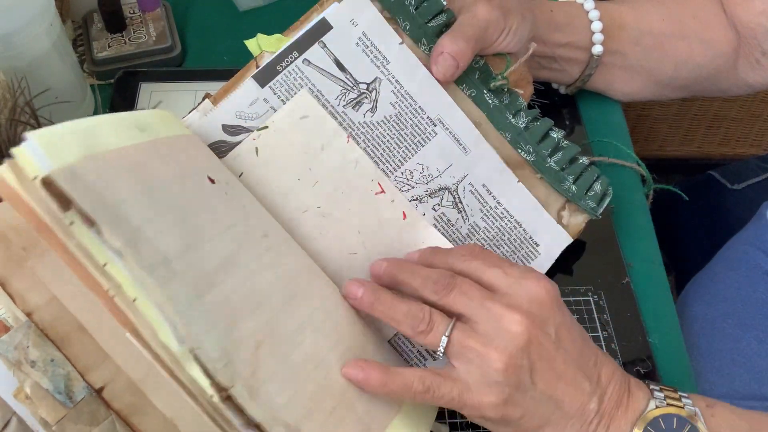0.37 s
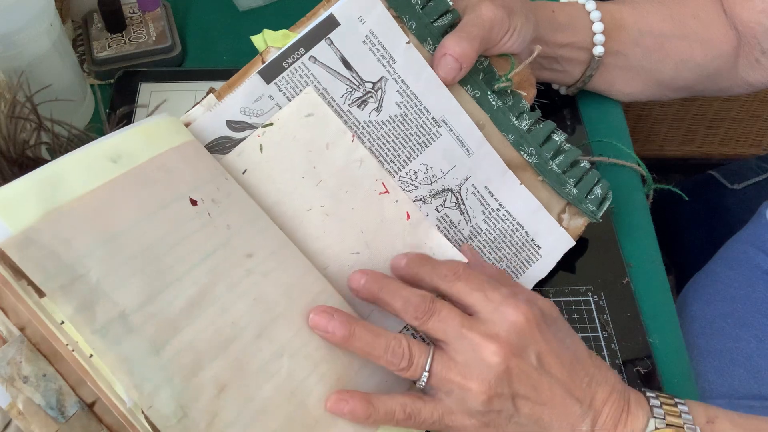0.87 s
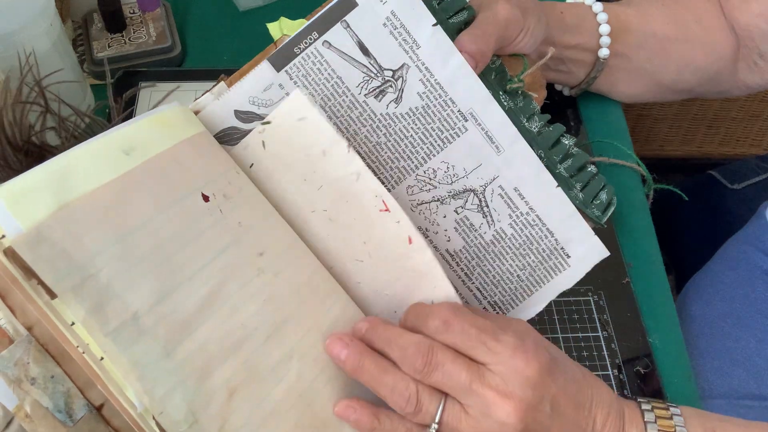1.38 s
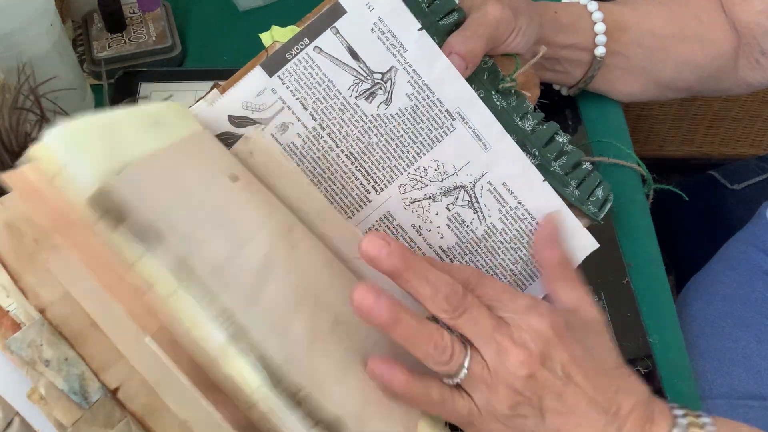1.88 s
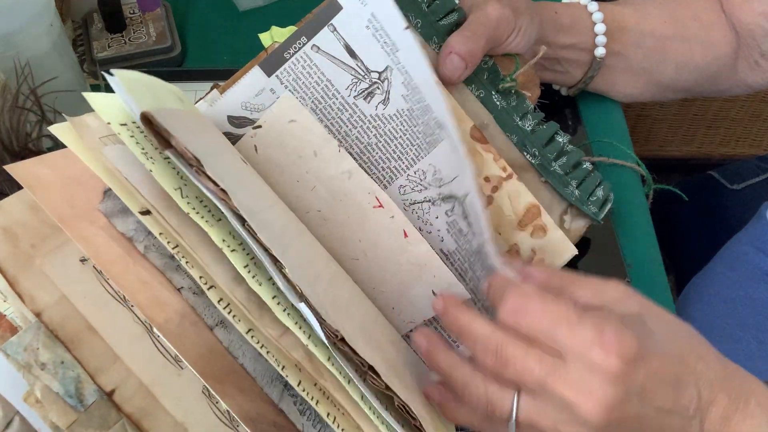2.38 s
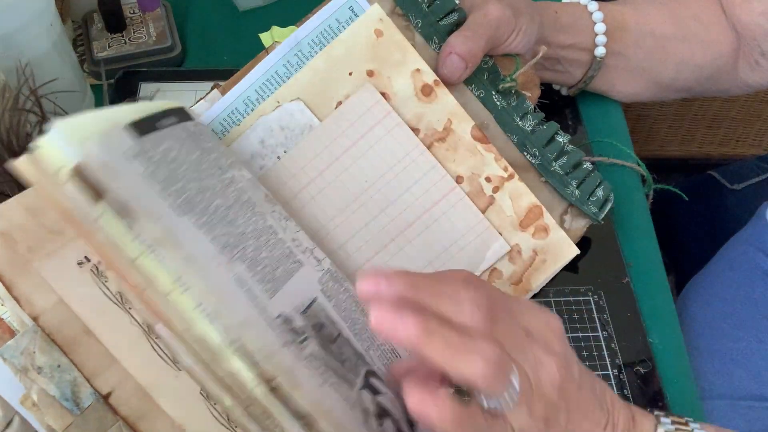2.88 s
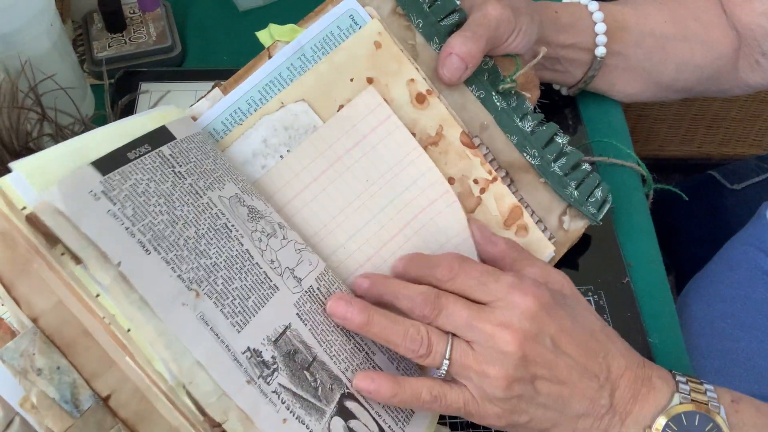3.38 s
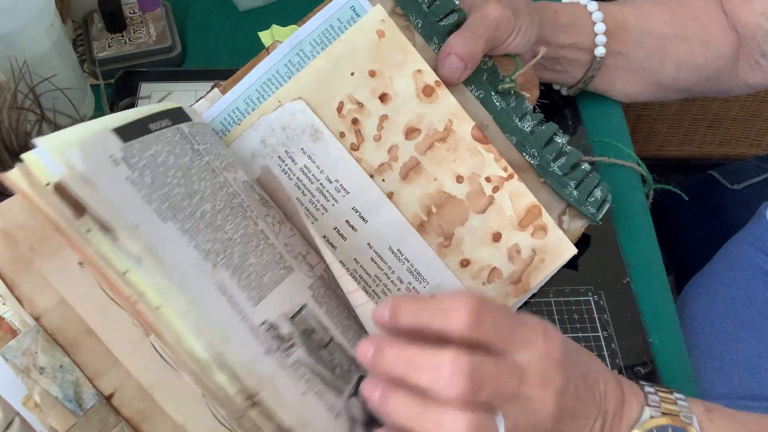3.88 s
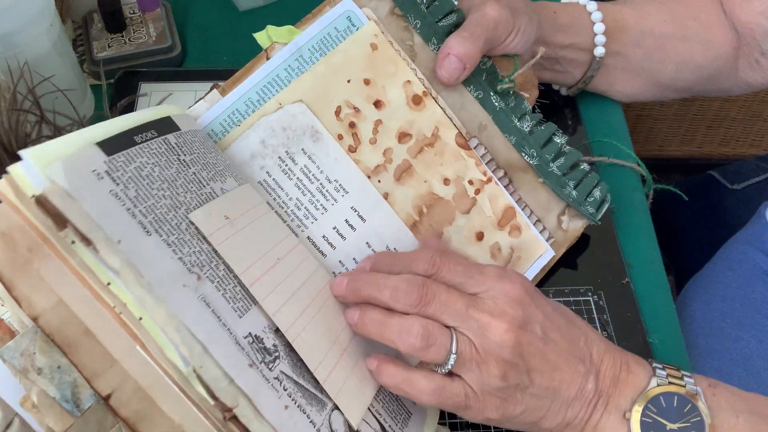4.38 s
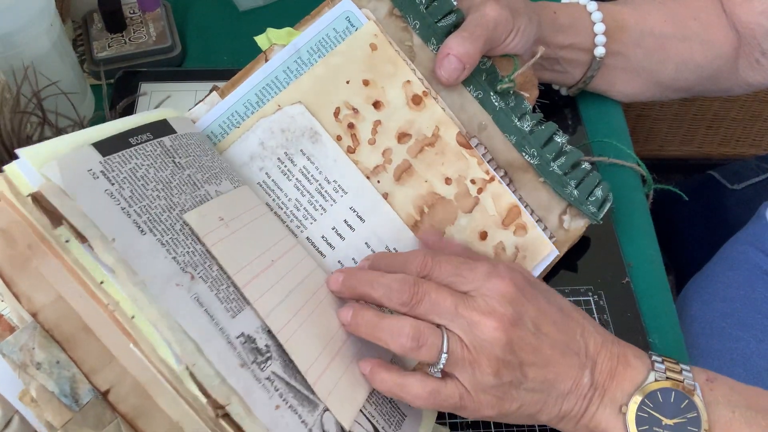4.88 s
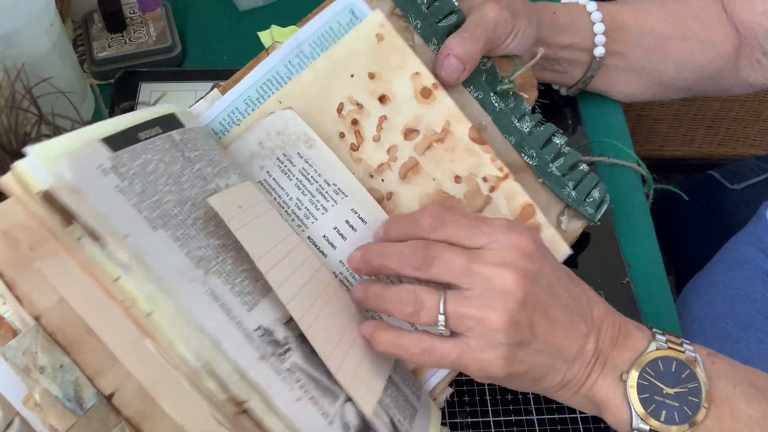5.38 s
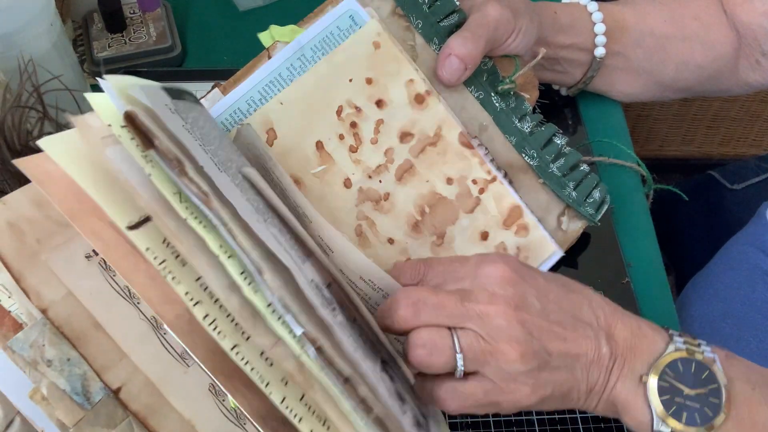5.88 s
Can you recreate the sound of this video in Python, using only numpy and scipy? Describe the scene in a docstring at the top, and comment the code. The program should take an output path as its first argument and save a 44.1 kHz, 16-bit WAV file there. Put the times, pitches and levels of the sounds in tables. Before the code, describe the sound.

Hands handle a thick paper journal at close range in a still, furnished room. Faint skin-on-paper rubs and light brushes come first, then a bright sharp snap with a flick just after two seconds. Softer rustles, small ticks and low bumps follow, a quieter stretch of rubbing, then a dense cluster of crackling page flips near the end.

```python
"""A faint rub of skin on thick paper comes first; hands then slide over, lift and flick the pages of a journal.
Strokes are friction noise tinted by the bent sheet, snaps are bursts of crackle with a ringing tail,
and thuds are sagging low tones with a flap of pages, all over the still air of a quiet furnished room.
A small recorder close by has two ports and takes most of its treble from the left one."""
import sys
import numpy as np
from scipy import signal
from scipy.fft import rfft, irfft, next_fast_len
from scipy.io import wavfile
from scipy.ndimage import uniform_filter1d, map_coordinates

SR = 44100
rng = np.random.default_rng(int(sys.argv[2]) if len(sys.argv) > 2 else 0)


def bounce(signal):
    """Save signal as a 16-bit WAV file at the path given by the first command-line argument."""
    frames = np.transpose(np.atleast_2d(signal))
    limited = np.clip(frames, -1, 1)
    pcm = np.round(limited * 32767).astype(np.int16)
    wavfile.write(sys.argv[1], SR, pcm)


def decibels_to_gain(level_db):
    """Convert a level in decibels to a linear amplitude gain (20 dB per decade)."""
    exponent = np.asarray(level_db, float) / 20
    return 10 ** exponent


N = 264159  # samples

# spectral shape of the hiss as heard, with a steep band limit at the top: f/Hz, density level/dB (relative)
HISS_SPECTRUM = [(4500, -27.5), (7000, 5), (10000, 1), (11500, -3.5), (15750, -3), (16000, -60)]


def unit(x):
    """Normalisation: the signal is scaled to rms 1."""
    return x / np.sqrt(np.mean(x ** 2) + 1e-20)


def along(points, hz):
    """Interpolation of (f/Hz, value) points on a logarithmic frequency axis."""
    f, v = np.transpose(points)
    return np.interp(np.log(hz + 1), np.log(f + 1), v)


def filtered(x, response):
    """Linear filtering: the spectrum is multiplied by a complex response of frequency."""
    m = next_fast_len(x.shape[-1] + 8192)
    hz = np.fft.rfftfreq(m, 1 / SR)
    return irfft(rfft(x, m) * response(hz), m)[..., :x.shape[-1]]


def coloured(x, spectrum):
    """Spectral shaping at constant power: white noise keeps its mean square."""
    power = np.mean(decibels_to_gain(2 * along(spectrum, np.linspace(0, SR / 2, 999))))
    return filtered(x, lambda hz: decibels_to_gain(along(spectrum, hz)) / np.sqrt(power))


def wobble(rate):
    """Slow random modulation: a smooth curve through rate random knots a second."""
    knots = rng.standard_normal(int(N * rate / SR) + 4)
    return map_coordinates(knots, [np.arange(N) * rate / SR])


def gritty(slow_db, fast_db, crinkle_db):
    """Stick-slip friction: two unrelated noises share one uneven grip, as fibres catch in clumps and crinkles pop."""
    pops = (rng.random(N) < 70 / SR) * decibels_to_gain(crinkle_db + 3.4 * rng.standard_normal(N))  # about 70 a second
    crinkles = signal.fftconvolve(pops, np.exp(-np.arange(300) / 45))[:N]  # each decays with a 1 ms time constant
    grip = decibels_to_gain(slow_db * wobble(35) + fast_db * wobble(600)) + crinkles
    return unit(grip * rng.standard_normal((2, N)))


def page_flap():
    """Flexural motion of loose sheets: gritty noise confined to low frequencies."""
    # spectral shape of flapping pages: f/Hz, density level/dB (relative)
    flap_spectrum = [(60, -27), (180, -9.5), (500, -4.5), (900, -19), (1500, -27.5)]
    return coloured(gritty(slow_db=2.5, fast_db=1.7, crinkle_db=3), flap_spectrum)


def room_air():
    """Stationary background noise: the still air of the room is white noise shaped towards the bass."""
    # spectral shape of the room air: f/Hz, density level/dB (relative)
    air_spectrum = [(15, -71), (25, -9), (68, -1.5), (117, -2), (175, -10.5), (206, -11.5), (438, -24.5),
                    (589, -38), (1130, -27), (15900, -40)]
    return decibels_to_gain(-73.5) * coloured(rng.standard_normal((2, N)), air_spectrum)


def thuds():
    """Damped oscillation: the book pushes softly into the table, its pitch wavers and sags, and the pages flap."""
    # the book rocking on the table: t/s, tone level/dB, nominal f/Hz, page flap level/dB (before rise and decay)
    thud_table = [(1.8, -62, 86, -60), (1.938, -54, 126, -48), (2.261, -50.5, 84, -48),
                  (2.455, -71, 113, -53), (3.007, -42, 113, -44.5), (3.599, -62, 85.5, -62),
                  (3.81, -61, 85, -59), (3.911, -59, 102, -57), (4.21, -44, 76, -45.5),
                  (4.639, -55, 75.4, -56), (4.967, -56, 96, -55), (5.402, -51, 81, -67),
                  (5.671, -47.5, 107, -41.5), (5.753, -48, 69.6, -48), (5.915, -54, 138, -44)]
    tone_t60, flap_t60 = 0.23, 0.24  # s
    pivot_hz = 145  # the pitch starts above this and sags to slightly below its nominal value
    tone, puff = np.zeros(N + SR), np.zeros(N + SR)
    t = np.arange(SR // 3) / SR
    for s, tone_db, hz, flap_db in thud_table:
        start = round(s * SR)
        waver = 0.1 * map_coordinates(rng.standard_normal(20), [t * 45])
        sag = (pivot_hz / hz) ** (1.8 * np.exp(-t / 0.011) - 0.15)
        phase = 2 * np.pi * np.cumsum(hz * (1 + waver) * sag) / SR
        lumps_db = 4 * map_coordinates(rng.standard_normal(20), [t * 30])  # the book settles unevenly
        rise = 1 - np.exp(-t / 0.0055)
        tone[start:][:len(t)] += decibels_to_gain(tone_db + lumps_db - 60 * t / tone_t60) * rise * np.sin(phase)
        puff[start:][:len(t)] += decibels_to_gain(flap_db - 60 * t / flap_t60) * rise
    return (tone[:N] + puff[:N] * page_flap()) * [[1], [0.4]]  # weights of the common and the opposed part


def snaps():
    """Sudden release of elastic energy: a crease gives way in brief crackle, then sheet and room ring on."""
    # creases and edges snapping, and one short hissing stroke at 1.974 s:
    # t/s, crack level/dB, body level/dB, edge level/dB, crackle T60/ms
    snap_table = [(0.914, -61, -65, -62, 11.6), (1.117, -58.5, -72, -56, 24), (1.59, -53, -60.5, -66, 23),
                  (1.687, -46.5, -64, -68, 23), (1.974, -55, -66, -43, 48), (2.103, -59, -47, -57, 18),
                  (2.19, -76, -54.5, -64, 11.3), (2.234, -43, -69, -51, 16), (2.25, -34, -46, -31, 24),
                  (2.2555, -18, -50, -25.5, 21.3), (2.268, -33.5, -40.5, -52, 14.7),
                  (2.389, -73, -49, -56, 5.6), (2.463, -55, -48.5, -70, 35), (2.572, -46, -55, -56, 18),
                  (2.68, -54.5, -53.5, -60, 10), (2.734, -43.5, -85, -38.5, 8.5),
                  (2.752, -40, -73, -59, 7.3), (2.771, -46, -49.5, -57, 14.5), (2.953, -55, -52, -51, 57),
                  (3.004, -41, -43.5, -31, 32), (3.119, -53, -56, -50, 12),
                  (3.2075, -38.5, -46.5, -47.5, 7.9), (3.312, -48.5, -51, -65, 12),
                  (3.343, -60, -69, -52, 22), (3.369, -54.5, -70, -47, 9), (3.378, -70, -56.5, -63, 11),
                  (3.592, -51.5, -46.5, -40.5, 23.5), (3.817, -38, -75, -59, 10),
                  (3.906, -34, -39.5, -39.5, 14), (3.915, -26.5, -38, -55, 14.7),
                  (4.147, -57, -71, -54.5, 11), (4.158, -66, -56, -57, 17), (4.208, -56, -45.5, -53, 34),
                  (4.219, -66, -52, -59, 21), (4.253, -44, -52, -34.5, 21), (4.282, -54, -64, -51, 12),
                  (4.309, -52, -53.5, -49, 16), (4.638, -56.5, -51, -49.5, 36),
                  (4.967, -53.5, -48.5, -47.5, 11.2), (5.119, -63, -50.5, -71, 11.3),
                  (5.341, -72, -58, -72, 8.7), (5.357, -51, -44, -77, 35), (5.405, -31, -35.5, -27.5, 12),
                  (5.415, -33, -40, -35, 24), (5.671, -22.5, -25, -42, 8.8), (5.674, -30.5, -34, -25.5, 17),
                  (5.701, -29, -40, -32, 11), (5.7084, -25, -37.5, -26, 11.6), (5.746, -30, -33, -22, 19.2),
                  (5.765, -32, -35, -47, 17), (5.911, -25.5, -33.5, -16.5, 13),
                  (5.916, -24, -37.5, -49, 21.3)]
    # spectral shape of the crack: f/Hz, level/dB (relative)
    crack_spectrum = [(300, -95), (1200, -12.5), (2200, -2), (4000, 6), (6500, -7.5), (8500, -42)]
    # spectral shape of the body knock: f/Hz, level/dB (relative)
    body_spectrum = [(60, -63), (250, 0), (500, -5), (1100, 6.5), (2000, 4.5), (3000, -23)]
    edge_spectrum = HISS_SPECTRUM[:-1] + [(16800, -33)]
    ring_t60 = 0.27  # s
    attack_share = 0.078  # of the crackle T60: slow creases also start softly
    crackle_db, tick_db = 6.5, 15  # the tick is also scaled inversely with T60

    out = np.zeros((2, N + SR))
    t = np.arange(-256, 12032) / SR  # the lead leaves room for the zero-phase colouring
    hz = np.fft.rfftfreq(len(t), 1 / SR)
    crack, body, edge = (unit(decibels_to_gain(along(c, hz))) for c in (crack_spectrum, body_spectrum, edge_spectrum))

    def bumps(size):
        return unit(uniform_filter1d(rng.standard_normal(len(hz)), size))

    for s, crack_db, body_db, edge_db, t60_ms in snap_table:
        t60 = t60_ms / 1000
        attack = attack_share * t60
        # relative to its snap, the ring is weaker the louder the snap
        ring_db = -9.5 - 0.31 * (max(crack_db, body_db, edge_db) + 45)
        settle_db = 2.17 * map_coordinates(rng.standard_normal(40), [np.abs(t) * 90])  # the sheet settles
        crackle = decibels_to_gain(crackle_db - 60 * t / t60)
        ring = decibels_to_gain(ring_db + settle_db - 60 * t / ring_t60)
        burst = (crackle + ring) * np.clip(t / attack, 0, 1) * rng.standard_normal((2, len(t)))
        # the first fibre breaks as one sharp tick
        burst[0, np.searchsorted(t, attack)] += decibels_to_gain(tick_db) * 0.014 / t60
        tint_db = 1.5 * bumps(200) + bumps(40)  # each snap has its own
        colour = decibels_to_gain(tint_db) * (decibels_to_gain(crack_db) * crack + decibels_to_gain(body_db) * body + decibels_to_gain(edge_db) * edge)
        out[:, round((s + t[0]) * SR):][:, :len(t)] += irfft(rfft(burst) * colour, len(t))
    return out[:, :N]


def strokes():
    """Friction exciting a resonator: each stroke swells and fades, singing in the moving resonance of the sheet."""
    # strokes of skin and paper: peak t/s, half length/ms (limited to 150), rub level/dB, hiss level/dB
    stroke_table = [(0.005, 95, -58.5, -62), (0.203, 31.6, -48, -66), (0.294, 60, -46, -53.5),
                    (0.376, 19, -70, -52.5), (0.546, 8, -63.5, -58.5), (0.62, 45, -59.5, -57),
                    (0.703, 48, -57.5, -59.5), (0.835, 24.4, -56, -54.5), (0.936, 44, -63, -66),
                    (1.011, 33, -60.5, -68), (1.175, 35, -50.5, -51), (1.274, 29.5, -60.5, -54),
                    (1.515, 68, -51, -55), (1.633, 18.6, -48, -47), (1.705, 20.3, -46.5, -51.5),
                    (1.833, 30, -46, -44.5), (1.925, 80, -50, -50.5), (2.115, 9.3, -49.5, -75),
                    (2.217, 60, -57, -56), (2.267, 13.5, -33, -58), (2.335, 62, -48.5, -56),
                    (2.56, 72, -57, -57.5), (2.7, 81, -53, -51.5), (2.761, 15, -58, -45),
                    (3.015, 57.6, -50.5, -51), (3.158, 34, -55, -51), (3.346, 52, -58, -57.5),
                    (3.484, 33, -62, -61.5), (3.65, 145, -55.5, -60.5), (3.825, 48, -50.5, -49),
                    (3.91, 7.7, -38.5, -43), (4.12, 72, -60.5, -69.5), (4.257, 44, -49, -48.5),
                    (4.379, 28, -44.5, -51.5), (4.505, 110, -64, -78), (4.568, 30.7, -53.5, -52),
                    (4.758, 27.6, -47.5, -53.5), (4.851, 140, -64.5, -89), (4.915, 24.5, -56.5, -53.5),
                    (5.105, 20, -49, -53), (5.157, 97, -58, -88), (5.442, 52.5, -45, -52.5),
                    (5.6, 180, -53.5, -58.5), (5.695, 21, -38.5, -63), (5.739, 75, -40.5, -44.5),
                    (5.937, 21.2, -37, -49), (5.99, 22, -45, -56)]
    # resonance of the bent sheet: t/s, f/Hz
    sheet = [(0.0, 1470), (0.1, 2370), (0.65, 5100), (0.9, 3300), (1.15, 5100), (1.35, 3100), (2.02, 2600),
             (2.1, 3800), (2.42, 4070), (2.48, 2130), (3.28, 2450), (3.62, 2200), (3.74, 3570),
             (4.24, 2260), (4.65, 2030), (5.81, 2740), (5.87, 4040)]
    # how loosely the handled pages hang: t/s, low flap level relative to the rub/dB
    loose = [(0.1, -21), (0.6, -29.5), (1.4, -21.5), (1.9, -19), (2.6, -25.5), (3.2, -14.5), (3.9, -25),
             (4.3, -14.5), (5.1, -9), (5.5, -23.5), (5.9, -18)]
    # spectral shape of the rub: f/Hz, density level/dB (relative)
    rub_spectrum = [(300, -23), (800, -5.5), (1500, -1.5), (3000, -3.5), (6000, -5), (8500, -28.5)]
    fall_over_rise = 1.1  # a stroke fades a little slower than it swells

    power, now = np.zeros((3, N)), np.arange(N) / SR
    for s, half_ms, rub_db, hiss_db in stroke_table:
        width = min(half_ms, 150) / 1000 * np.where(now < s, 1, fall_over_rise)
        flap_db = rub_db + np.interp(s, *np.transpose(loose))
        peak_power = decibels_to_gain(2 * np.array([rub_db, hiss_db, flap_db]))
        power += peak_power[:, None] * np.exp(-((now - s) / width) ** 2)
    rub_gain, hiss_gain, flap_gain = np.sqrt(power)

    grit = gritty(slow_db=2.5, fast_db=1.0, crinkle_db=-3.5)
    hz, t, z = signal.stft(grit, SR, nperseg=512, noverlap=384)

    def patch(tall, long):
        """Random spectral tint: noise smoothed over tall frequency bins and long frames."""
        field = uniform_filter1d(rng.standard_normal(z.shape[1:]), tall, axis=0)
        return unit(uniform_filter1d(field, long, axis=1))

    def resynthesised(gain):
        """Time-varying filtering: the weighted short-time spectra are overlapped and added."""
        return signal.istft(z * gain, SR, nperseg=512, noverlap=384)[1][:, :N]

    octaves = np.log2((hz[:, None] + 1) / np.interp(t, *np.transpose(sheet)))
    resonance_db = 6.7 * np.exp(-(octaves / 0.72) ** 2)
    tint_db = 1.8 * patch(8, 14) + 4.5 * patch(1, 40)  # broad patches and narrow bands, as from reflections
    gain = decibels_to_gain(along(rub_spectrum, hz)[:, None] + resonance_db + tint_db)
    gain /= np.sqrt(np.mean(gain ** 2, axis=0))
    rub = resynthesised(gain)
    # the hiss gets a random tint in broad patches and in narrow, slowly changing bands
    hiss_tint = decibels_to_gain(1.5 * patch(12, 20) + 2.5 * patch(1, 30))
    hiss = unit(coloured(resynthesised(hiss_tint), HISS_SPECTRUM))
    return rub_gain * rub + hiss_gain * hiss + flap_gain * page_flap()


def ports(pair):
    """Partial coherence: a common and an opposed part make left and right; the left is earlier and mostly louder."""
    # likeness of left and right: f/Hz, coherence (0-1)
    alike = [(100, 0.57), (400, 0), (1200, 0.54), (2500, 0.74), (5000, 0)]
    # left louder than right: f/Hz, level difference/dB
    left_excess = [(100, 0.5), (1000, 4), (2500, 1.5), (5000, -0.5)]
    left_leads = 0.00013  # s, the pages lie nearer the left port
    side = np.array([[1], [-1]])

    def share(hz):
        angle = np.arccos(np.clip(along(alike, hz), 0, 1)) / 2
        return np.array([np.cos(angle), np.sin(angle)])

    def reach(hz):
        return decibels_to_gain(side * along(left_excess, hz) / 2) * np.exp(1j * side * np.pi * hz * left_leads)

    common, opposed = filtered(pair, share)
    return filtered(common + side * opposed, reach)


def scene():
    """Superposition: air, thuds, snaps and strokes add before they reach the ports."""
    return ports(room_air() + thuds() + snaps() + strokes())


def band_limit(x):
    """A steep low-pass at the top of the band."""
    return signal.sosfilt(signal.butter(12, 16780, fs=SR, output="sos"), x)


def record(dry):
    """Crossover and phase difference: left-port treble feeds both sides, late on the left, in and out of step."""
    crossover_hz, in_step_hz = 6990, 12250
    treble_lag = 1.265e-4  # s, left behind right
    side = np.array([[-1], [1]])

    def high(hz):
        return 0.97 / (1 + (crossover_hz / (hz + 1)) ** 24)

    def treble_path(hz):
        shift = np.exp(1j * np.pi * side * (hz - in_step_hz) * treble_lag)
        return np.sqrt(high(hz)) * shift

    def own_path(hz):
        return (1 - high(hz)) / (1 + (32 / (hz + 1)) ** 4)  # no deep bass

    treble = filtered(dry[[0, 0]], treble_path)
    own = filtered(dry, own_path)
    return band_limit(own + treble)


dry = scene()
out = record(dry)
bounce(out)
```